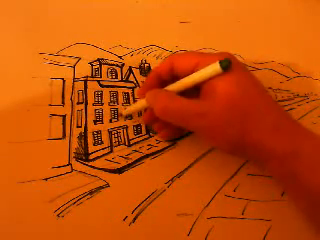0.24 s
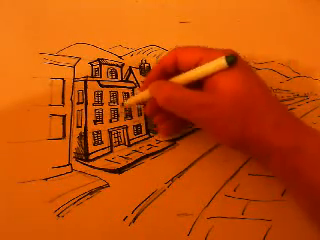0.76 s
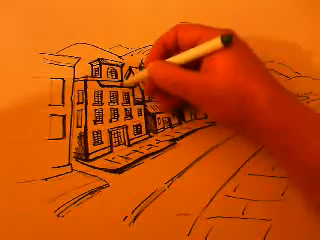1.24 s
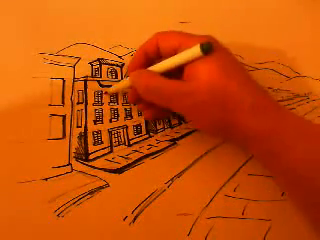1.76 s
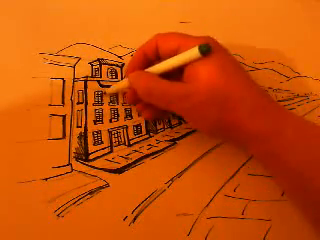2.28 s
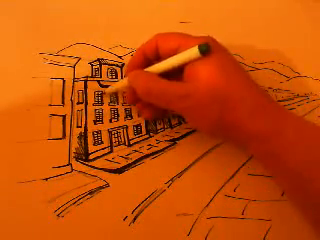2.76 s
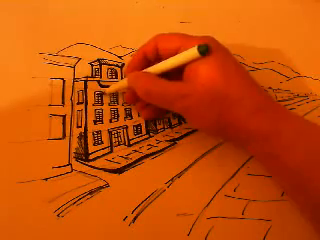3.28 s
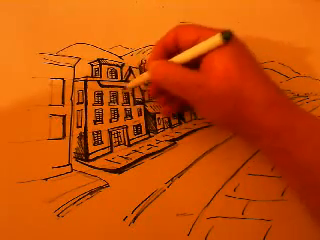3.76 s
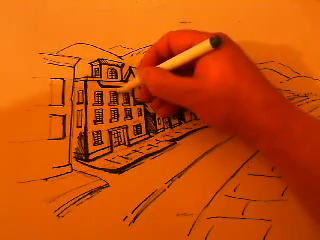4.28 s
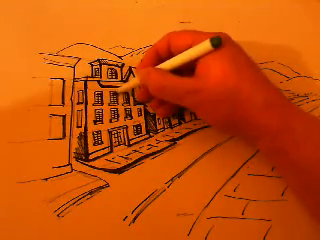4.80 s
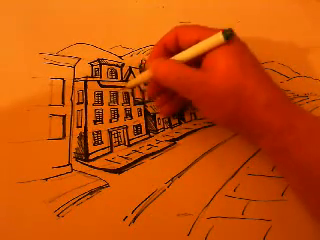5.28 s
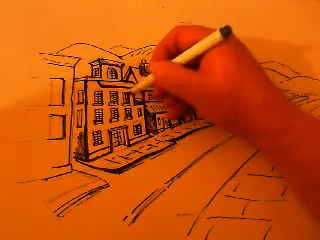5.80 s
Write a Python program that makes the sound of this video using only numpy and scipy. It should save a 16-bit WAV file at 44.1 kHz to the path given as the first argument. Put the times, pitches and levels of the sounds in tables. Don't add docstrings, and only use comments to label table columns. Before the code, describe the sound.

A quiet small room with a faint, slightly wavering low fan hum, soft microphone hiss and a thin, very high electronic whine throughout. A felt-tip pen works on paper close by. At 0.1 s there is a soft dry swish, then light flicks at 0.3 and 0.75 s and tiny bright ticks around 0.4, 0.6 and 0.84 s. Gentle strokes pass at 1.1 and 1.65 s. Clearer, brighter hisses come at 2.2 and 2.5 s, with a shorter one at 2.7 s. From 3.0 to 3.75 s strokes grow busier, with dull desk and board knocks and gritty rubs. After a pause, a soft thump at 4.1 s leads to quick tapping strokes from 4.4 s; the hardest, sharpest tap lands at 4.86 s, another crisp tick at 5.1 s. It quietens after 5.3 s, then a rub at 5.8 s and a darker firm stroke at 5.95 s.

```python
import sys
import numpy as np
from scipy import signal
from scipy.fft import rfft, irfft
from scipy.io import wavfile

SR = 44100
rng = np.random.default_rng(int(sys.argv[2]) if len(sys.argv) > 2 else 0)


def undo_db(level):
    steps = np.asarray(level, float) / 20
    return 10 ** steps


def master(y):
    cut = np.clip(np.atleast_2d(y).T, -1, 1)
    pcm = np.round(cut * 32767)
    wavfile.write(sys.argv[1], SR, pcm.astype(np.int16))


N = 266364
TIME = np.arange(N) / SR

# (frequency [Hz], level [dB], t60 [s])
DESK_MODES = [(71, 0, .2), (85, -8, .14), (152, -4, .22)]
# (frequency [Hz], level [dB], t60 [s])
BOARD_MODES = [(200, -8, .09), (232, -1, .15), (266, 3, .12), (330, -2, .08), (410, 0, .13), (480, -3, .06)]
# (frequency [Hz], level [dB], t60 [s])
PAPER_LOW_MODES = [(5370, 8, 0.0028), (5746, 1, 0.011), (6170, 6, 0.0072), (6600, -4, 0.013)]
PAPER_HIGH_MODES = [(7700, -0.5, 0.0021), (8240, -1, 0.006), (8800, -4.5, 0.0086), (9700, -0.5, 0.0037),
                    (10360, -8, 0.0088)]


def rms_one(x):
    return x / np.sqrt(np.mean(x ** 2) + 1e-20)


def band(x, low_hz, high_hz):
    return signal.sosfilt(signal.butter(3, [low_hz, high_hz], "band", fs=SR, output="sos"), x)


def drift(rate_hz):
    pole = np.exp(-2 * np.pi * rate_hz / SR)
    slow = signal.lfilter([1], [1, -2 * pole, pole * pole], rng.standard_normal(N + SR))
    return rms_one(slow[SR:])


def ring(force, modes):
    out = 0
    for hz, level_db, t60_s in modes:
        r = undo_db(-60 / (t60_s * SR))
        w = 2 * np.pi * hz / SR
        numerator = [0, undo_db(level_db) * np.sin(w)]
        out = out + signal.lfilter(numerator, [1, -2 * r * np.cos(w), r * r], force + 1e-18)
    return out


def grains(per_s, spread_db):
    sizes = undo_db(spread_db * np.minimum(rng.exponential(1, N), 5))
    signs = rng.choice([-1, 1], N)
    return sizes * signs * (rng.random(N) < per_s / SR)


def blows(times_s, levels_db, soft_hz):
    force = np.zeros(N)
    force[(np.array(times_s) * SR).astype(int)] = undo_db(levels_db)
    return signal.lfilter(*signal.butter(1, soft_hz, fs=SR), force)


def crack(force, t60_s):
    envelope = signal.lfilter([1], [1, -undo_db(-60 / (t60_s * SR))], force)
    return band(envelope * rng.standard_normal(N), 4800, 9500)


def floor():
    # (frequency [Hz], density [dB per Hz])
    spectrum = [(15, -3.5), (40, -0.5), (75, -2.5), (105, -7), (250, -9), (400, -12), (700, -16),
                (1100, -16), (2000, -20.5), (4000, -22), (7000, -23), (10000, -23), (13000, -21.5),
                (15700, -21)]
    hz, level_db = np.transpose(spectrum)
    bins_hz = np.arange(N // 2 + 1) * SR / N + 1
    colour = undo_db(np.interp(np.log(bins_hz), np.log(hz), level_db))
    hiss = rms_one(irfft(rfft(rng.standard_normal(N)) * colour, N))
    sway = rms_one(band(rng.standard_normal(N), 8.0, 14))
    return undo_db(-68) * hiss + undo_db(-75.5) * sway


def electronics():
    # (frequency [Hz], level [dB rms])
    steady_tones = [(120.04, -85), (3891.08, -96), (5298.73, -98), (7998.79, -88.5), (8100.15, -96),
                    (10698.86, -99), (13297.5, -99)]
    whine_hz, whine_db, frame_hz = 13500.28, -69.5, 15
    blank_start, blank_end = .985, 1.1
    tones = 0
    for hz, level_db in steady_tones:
        tones = tones + np.sqrt(2) * undo_db(level_db) * np.sin(2 * np.pi * hz * TIME + 7 * rng.random())
    reading = (TIME * frame_hz - blank_start) % 1 > blank_end - blank_start
    return tones + np.sqrt(2) * undo_db(whine_db) * reading * np.sin(2 * np.pi * whine_hz * TIME)


def fan():
    # (multiple of shaft rate [1], level [dB rms])
    harmonics = [(4, -90), (6, -83.5), (7, -84), (8, -87), (10, -81)]
    shaft_hz, casing_db = 30.6, -81
    beat_db, beat_s, beat_top_s = 3.5, 3.4, 0.22
    turn = 2 * np.pi * np.cumsum(shaft_hz * (1 + .002 * drift(.7))) / SR
    beat = beat_db * np.cos(2 * np.pi * (TIME - beat_top_s) / beat_s)
    hum = np.sqrt(2) * undo_db(casing_db + beat) * np.sin(5 * turn)
    for multiple, level_db in harmonics:
        gain = np.sqrt(2) * undo_db(level_db + 0.58 * drift(3.2))
        hum = hum + gain * np.sin(multiple * turn + 7 * rng.random())
    return hum


def room(x, t60_s, wet_db):
    t = TIME[:SR // 2]
    tail = rng.standard_normal(len(t)) * undo_db(-60 * t / t60_s) * (t > .004)
    tail = signal.lfilter(*signal.butter(1, [150, 3500], "band", fs=SR), tail)
    return undo_db(wet_db) * signal.fftconvolve(x, tail / np.linalg.norm(tail))[:N]


def lifts():
    # (time [s], desk thump [dB], board knock [dB])
    releases = [
        (3.124, -62.5, -68.5),
        (3.483, -65.5, -62.5),
        (4.127, -65.5, -85),
        (4.299, -69.5, -90),
        (4.627, -63, -65),
        (4.7033, -63, -66),
        (5.802, -68, -73),
    ]
    s, thump_db, board_db = np.transpose(releases)
    desk = ring(blows(s, thump_db + 4.5, 250), DESK_MODES)
    board = ring(blows(s, board_db + 2.5, 300), BOARD_MODES[:3])
    return -desk - board


def landings():
    # (time [s], desk thump [dB], tip sharpness [dB], upper board modes [dB relative])
    touchdowns = [
        (3.245, -69.5, -84, 1),
        (3.3739, -64, -64, 11),
        (3.549, -66.5, -73, 1),
        (4.387, -75, -80, 6),
        (4.5245, -65.5, -71, -5),
        (4.8573, -58, -51.5, -4),
        (4.981, -65, -68, -1.5),
        (5.1025, -61.5, -51, -11.5),
        (5.197, -66.5, -77, -4),
        (5.93, -73.5, -72, 1),
    ]
    # (frequency [Hz], level [dB], t60 [s])
    knock_modes = [(635, -14, 0.0085), (930, -15.5, 0.072), (1142, -1, 0.024), (1266, -1.5, 0.023),
                   (1860, -4, 0.0059), (3160, -4, 0.013)]
    bounce_s, bounce_db = .0065, -5
    desk_lag_s, barrel_lag_s = 0.0031, 0.00045
    s, thump_db, sharp_db, upper_db = np.transpose(touchdowns)
    board_db = thump_db - 4
    board_low = ring(blows(s, board_db - upper_db / 2 + 2.0, 980), BOARD_MODES[:3])
    board_high = ring(blows(s, board_db + upper_db / 2 + 3.0, 800), BOARD_MODES[3:])

    tick_db = -58.5 + 1 * (sharp_db + 49)
    tip = blows(s, tick_db, 12000) + blows(s + bounce_s, tick_db + bounce_db, 10000)
    paper = band(ring(tip, PAPER_LOW_MODES + PAPER_HIGH_MODES), 3900, 11000)
    tick = undo_db(-1) * paper + undo_db(11) * crack(tip, t60_s=0.0073)

    desk = ring(blows(s + desk_lag_s, thump_db + 7, 280), DESK_MODES)
    knock = ring(blows(s + barrel_lag_s, sharp_db + 0.5, 5500), knock_modes)
    return -desk + board_low + board_high + knock + tick


def pressure():
    # (start [s], length [s], rub [dB], upper modes
    # [dB relative])
    pressed = [
        (3.373, .092, -72, 0),
        (3.552, .065, -78.5, 2.5),
        (4.388, 0.06, -74.5, -3),
        (4.525, 0.1, -70.5, -3.5),
        (4.702, 0.06, -75, -1),
        (4.85, 0.056, -73, 3),
        (4.988, 0.052, -74, -1),
        (5.101, 0.039, -75, 5),
        (5.19, .055, -77, -5.5),
        (5.933, .074, -67, -11),
    ]
    # (start [s], length [s], rub [dB], upper modes [dB relative])
    slid = [
        (2.135, 0.047, -83, -3),
        (2.47, 0.048, -81.5, -13),
        (2.724, 0.038, -86, -3),
        (3.027, 0.12, -77.5, -5.5),
        (3.242, .078, -82, 2.5),
        (3.43, .037, -83, 1.5),
        (5.822, 0.06, -74, -8),
    ]
    let_go_s = .009
    low, high = np.zeros((2, N))
    # (strokes, rise [s], sag [dB/s])
    for rows, rise_s, sag_db_per_s in [(pressed, 0.0042, -84), (slid, 0.023, -1)]:
        for start_s, length_s, rub_db, upper_db in rows:
            since = TIME - start_s
            rise = np.clip(since / rise_s + 1, 0, 1)
            release = np.exp(-np.maximum(since - length_s, 0) / let_go_s)
            gain = rise * release * undo_db(rub_db + sag_db_per_s * np.clip(since, 0, length_s))
            low = low + gain
            high = high + gain * undo_db(upper_db)
    return low, high


def barrel():
    # (frequency [Hz], level [dB], t60 [s])
    low_modes = [(958, -3, 0.024), (993, -4.5, 0.034), (1091, 3, 0.046), (1175, -6.5, 0.0075)]
    high_modes = [(1247, -7.5, 0.018), (1450, -20, 0.0094), (1536, -4.5, 0.033), (1833, 2.5, 0.012),
                  (2170, -5.5, 0.0088), (2734, -3, 0.017), (3080, -4, 0.0095)]
    slips = grains(per_s=1500., spread_db=2.0) * undo_db(1.3 * drift(35))
    low, high = pressure()
    body_low = low * rms_one(band(ring(slips, low_modes), 730, 1310))
    body_high = high * rms_one(band(ring(slips, high_modes), 950, 4000))
    board = undo_db(-6) * high * rms_one(band(ring(slips, BOARD_MODES), 190, 517))
    return body_low + body_high + board


def strokes():
    # (fastest moment [s], fall [s], hiss [dB], brightness [dB])
    sweeps = [(.128, 0.034, -73, -1), (1.081, .067, -72, -6.5), (1.63, 0.045, -74, -5.5),
              (1.705, .055, -78, -3.2), (2.174, .031, -65.5, -2.5), (2.487, 0.03, -64, -3),
              (2.579, 0.017, -75.5, 1), (2.731, 0.027, -67, -2), (3.085, .058, -81.5, -10),
              (3.283, 0.031, -76.5, -3), (3.592, 0.043, -76.5, -2), (3.73, 0.04, -68.5, -2.5),
              (4.417, .027, -77, -6), (4.568, .031, -72.5, -4), (4.736, .028, -75.5, -3),
              (5.978, .026, -70.5, -3.5)]
    # (fastest moment [s], hiss [dB], brightness [dB])
    flicks = [
        (.329, -76, -4),
        (.736, -73.5, 0),
        (.844, -78, -2.9),
        (3.391, -75, -3),
        (4.864, -71.5, -7),
        (5.112, -73, -9),
    ]
    # (fastest moment [s], hiss [dB], brightness [dB])
    stops = [
        (3.456, -72.5, -3),
        (5.019, -77.5, -6),
        (5.882, -79.5, -8),
    ]
    return ([(s, 0.76 * fall_s, fall_s, *tone) for s, fall_s, *tone in sweeps]
            + [(s, 0.0098, 0.028, *tone) for s, *tone in flicks]
            + [(s, 0.024, 0.013, *tone) for s, *tone in stops])


def nib():
    # (time [s], peak [dB], frequency [Hz])
    snags = [
        (0.406, -58, 5190),
        (0.5464, -67, 8000),
        (0.632, -60, 5200),
        (0.8415, -57.5, 5140),
    ]
    slips = grains(per_s=9000., spread_db=2.5) * undo_db(0.99 * drift(54))
    low, high = np.zeros((2, N))
    for s, rise_s, fall_s, hiss_db, bright_db in strokes():
        width_s = np.where(TIME < s, rise_s, fall_s)
        speed = np.exp(-.5 * ((TIME - s) / width_s) ** 2)
        low += speed * undo_db(hiss_db - 4 - bright_db / 2)
        high += speed * undo_db(hiss_db - 2 + bright_db / 2)
    hiss_low = low * rms_one(band(ring(slips, PAPER_LOW_MODES), 4600, 7600))
    hiss_high = high * rms_one(band(ring(slips, PAPER_HIGH_MODES), 6800, 11200))
    rasp = (low + high) * undo_db(-16) * rms_one(band(slips, 1800, 4200))
    catches = 0
    for s, peak_db, hz in snags:
        catches = catches + ring(blows([s], peak_db, 11000), [(hz, -5, .02), (hz * 1.2, -14, .01)])
    return hiss_low + hiss_high + rasp + catches


def scene():
    pen = band(nib() + barrel() + landings() + lifts(), 40, 15000)
    return (pen + room(pen, t60_s=.3, wet_db=-9.5) + fan() + floor())[None]


def band_limit(x):
    return signal.sosfilt(signal.butter(12, 15830, fs=SR, output="sos"), x)


def record(dry):
    offset = -.00472
    return band_limit(dry + electronics() + offset)


dry = scene()
out = record(dry)
master(out)
```